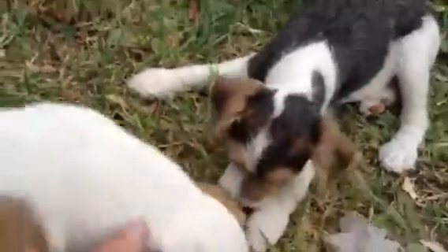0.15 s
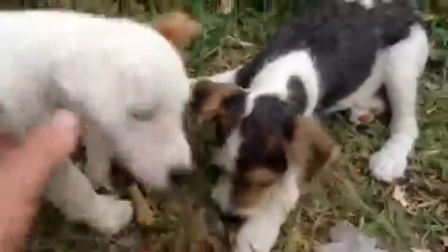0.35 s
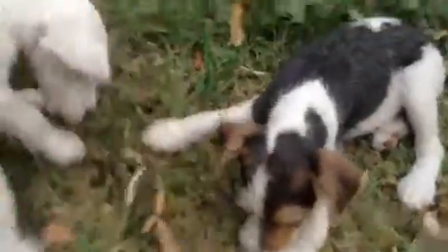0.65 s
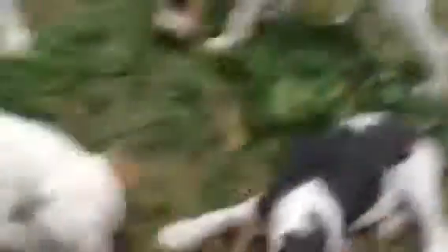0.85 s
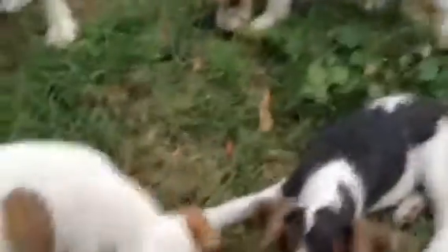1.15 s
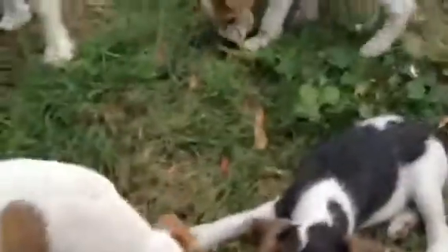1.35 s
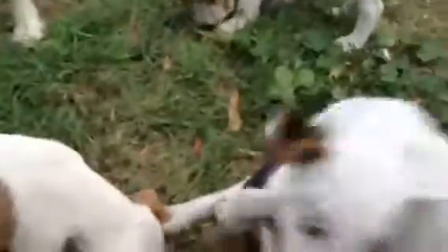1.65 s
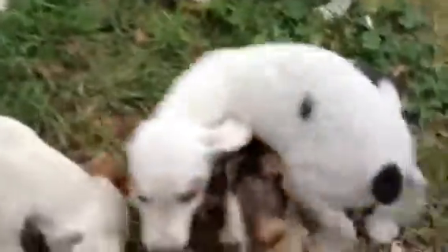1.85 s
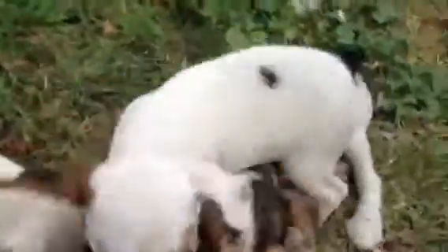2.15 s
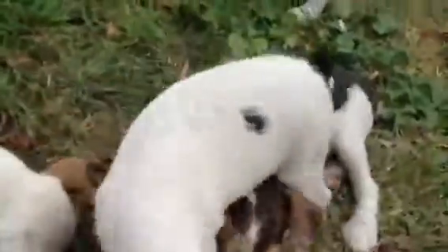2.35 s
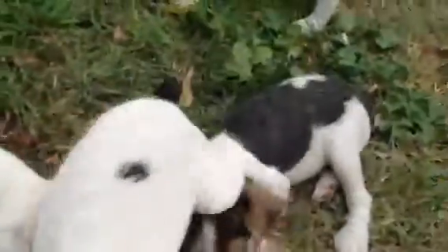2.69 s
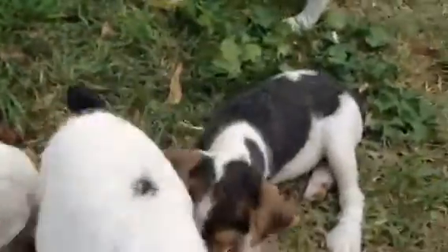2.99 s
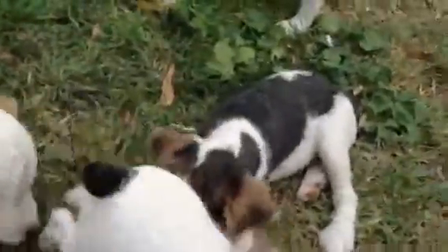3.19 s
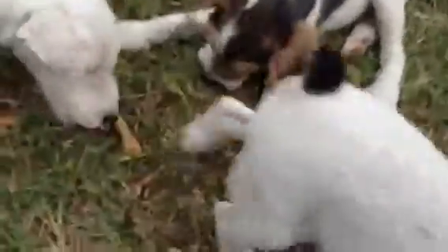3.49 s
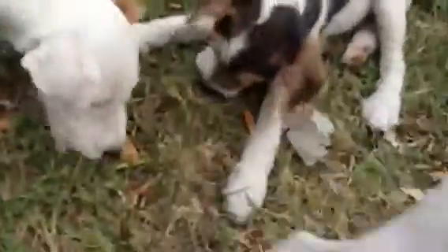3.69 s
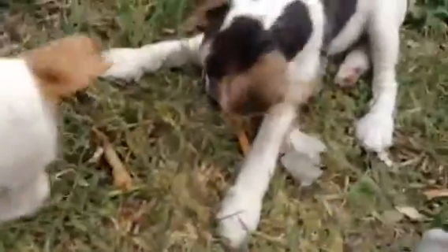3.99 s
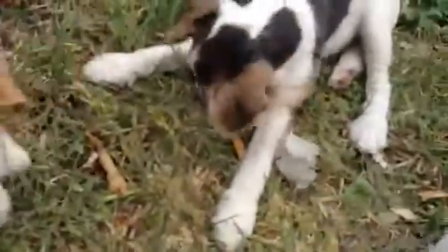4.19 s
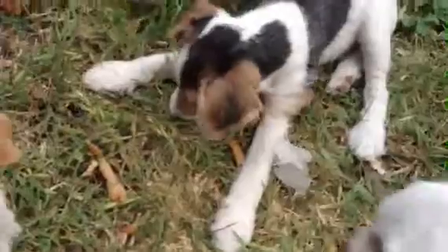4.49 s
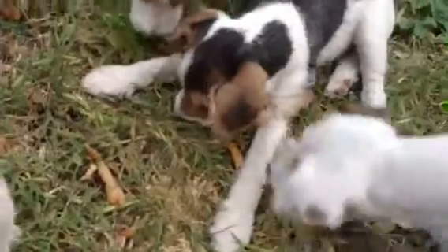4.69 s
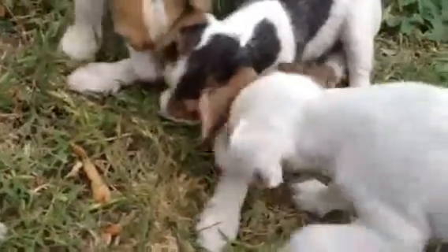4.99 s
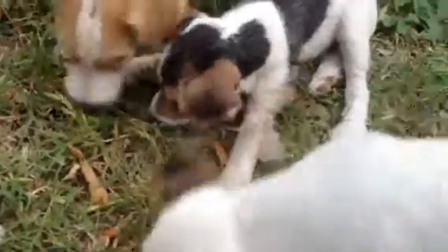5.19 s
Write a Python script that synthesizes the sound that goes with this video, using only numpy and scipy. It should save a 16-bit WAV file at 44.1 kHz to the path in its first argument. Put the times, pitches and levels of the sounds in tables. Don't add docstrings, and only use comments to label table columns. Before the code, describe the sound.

Puppies rustle through grass, snuffling and ticking their teeth, with one very loud splintering crunch at one second, sparrows chirping behind.

```python
import sys
import numpy as np
from scipy import signal
from scipy.fft import rfft, irfft
from scipy.io import wavfile
from scipy.ndimage import uniform_filter1d

SR = 44100
rng = np.random.default_rng(int(sys.argv[2]) if len(sys.argv) > 2 else 0)


def transcribe(u):
    v = np.clip(np.atleast_2d(u).T, -1, 1)
    q = np.round(v * 32767).astype(np.int16)
    wavfile.write(sys.argv[1], SR, q)


def makeup_ratio(level_db):
    decades = np.asarray(level_db, float) / 20
    return 10 ** decades


N = 235690
TIME = np.arange(N) / SR

# (time [s], peak level [dB], ring frequency [Hz], thud level [dB], decay time T60 [s])
CHEW_CRACKS = [(.9427, -17, 7200, -14, .005), (.9637, -27, 9400, -30, .004), (.9702, -27, 10200, -30, .012),
               (.9763, -13, 8200, -22, .012), (.9826, -4.5, 9200, -18, .006), (.9828, -12, 3600, -20, .006),
               (.9899, -5, 5500, -26, .004), (.9929, -20, 8100, -22, .003), (.9998, -40, 1800, 10, .004),
               (1.0031, -6, 9000, -26, .004), (1.0112, -14, 7500, -19, .008),
               (1.0120, -12, 7000, -13, .005), (1.0163, -6, 7000, -18, .005),
               (1.0180, -4, 10500, -24, .004)]


def unit(x):
    return x / np.sqrt(np.mean(x ** 2))


def columns(table, at=TIME):
    s, *rest = np.transpose(table)
    return [np.interp(at, s, c) for c in rest]


def colour(x, table):
    hz, db = np.transpose(table)
    f = np.maximum(np.arange(len(x) // 2 + 1) * SR / len(x), 1)
    gain = makeup_ratio(np.interp(np.log(f), np.log(hz), db))
    return irfft(rfft(x) * gain, len(x))


def band(x, hz, width):
    hz = min(hz, SR * .4)
    return signal.lfilter(*signal.iirpeak(hz, max(hz / width, .3), SR), x)


def walk(rate, size=N):
    hold = max(int(SR / rate), 1)
    levels = np.repeat(rng.standard_normal(size // hold + 1), hold)
    return 1.2 * uniform_filter1d(levels, hold)[:size]


def add(out, s, x):
    i = int(s * SR)
    out[i:i + len(x)] += x[:N - i]


def ducking(db, back_s):
    since = TIME - 1.01
    return db * (since > 0) * np.exp(-np.maximum(since, 0) / back_s)


def town():
    # (frequency [Hz], level [dB per Hz])
    town_colour = [(18, -58.5), (33, -40), (60, -17.5), (103, -0.5), (170, 1), (394, -7), (461, -8.5),
                   (721, -4), (1280, -5), (1700, -11), (2680, -19), (4300, -20), (8000, -27.5),
                   (16000, -41)]
    level_db = -60.5 + ducking(-3.5, 0.19) + ducking(-6, 0.72) + ducking(-2, np.inf)
    rumble_db = 2 + ducking(-4, 0.26) + ducking(-3, np.inf)
    swell_db = 4 * np.exp(-((TIME - 5.7) / 0.92) ** 2)
    level_db = level_db + 0.15 * swell_db
    rumble_db = rumble_db + swell_db

    air = colour(rng.standard_normal(N), town_colour)
    bass = colour(air, [(250, 1.5), (500, -21)])
    middle = colour(air, [(500, -40), (600, 0), (1500, 0), (1700, -40)])
    air = (air + bass * (makeup_ratio(rumble_db + .8 * walk(12)) - 1)) / np.std(middle)
    hum_db = -61.5 + ducking(-18, np.inf) + .8 * walk(6)
    hum = np.sin(2 * np.pi * 120 * TIME + 0.25 * walk(16)) * makeup_ratio(hum_db)
    return air * makeup_ratio(level_db + 0.6 * walk(5)) + hum


def whistle(hz, db):
    wobble = walk(300, size=8192)[:len(hz)]
    flutter = walk(163, size=8192)[:len(hz)]
    cycles = np.cumsum(hz * (1 + .009 * wobble)) / SR
    return makeup_ratio(db + 3 * flutter) * np.sin(2 * np.pi * cycles)


def sparrows():
    # (time [s], length [s], level [dB], upper top frequency [Hz], lower voice level [dB])
    chirp_events = [
        (.151, .106, -50.5, 4130, 0),
        (1.026, .104, -65.5, 4150, -4),
        (2.14, .112, -56.5, 4030, 0),
        (3.988, .106, -55.5, 4110, -2),
    ]
    # (share of length [1], upper pitch ratio [1], lower pitch ratio [1], upper [dB], lower [dB])
    chirp_arc = [(0, .88, .8, -22, -15), (.12, .935, .86, -7, -9), (.24, .975, .92, 0, -5),
                 (.4, 1, .99, -1, -5), (.56, .985, .985, -2, 0), (.72, .965, .92, -8, -1),
                 (.88, .95, .87, -17, -5), (1, .94, .83, -24, -14)]
    # (time [s], length [s], level
    # [dB], start frequency [Hz], end frequency [Hz])
    thin_notes = [(.655, .022, -61, 3830, 3900), (.68, .016, -63, 3400, 3450),
                  (.701, .016, -55, 3400, 3440), (.733, .02, -60, 3480, 3560),
                  (.757, .035, -65, 3600, 3500), (2.095, .06, -64, 2720, 3350),
                  (2.155, .022, -62, 3550, 3640), (2.714, .024, -65, 3880, 3820),
                  (2.762, .024, -63, 4600, 4900), (2.776, .02, -65, 3380, 3320),
                  (2.8, .052, -63, 3370, 3520), (2.856, .014, -68, 3450, 3400),
                  (3.39, .014, -60, 3380, 3330), (4.512, .03, -62, 3380, 3420),
                  (4.56, .035, -64, 3500, 3280), (4.675, .012, -62, 3750, 4000),
                  (4.694, .02, -58, 3900, 3650), (4.724, .018, -62, 3150, 3400),
                  (5.308, .014, -53, 3920, 3880), (5.316, .016, -54, 3620, 3680),
                  (5.334, .012, -58, 3700, 3750)]
    # (time [s], length [s], level [dB], centre frequency [Hz], width [Hz])
    hoarse_rasps = [(0.624, 0.083, -57.5, 4330, 1100), (2.699, .06, -65, 4300, 1400),
                    (2.756, 0.077, -63, 4200, 1200), (4.496, 0.094, -63.5, 3500, 1100),
                    (4.676, 0.045, -62, 4200, 1300), (5.299, 0.035, -61, 3760, 600)]
    out = np.zeros(N)
    for s, length, db, upper_hz, lower_db in chirp_events:
        up, low, up_db, low_db = columns(chirp_arc, TIME[:int(length * SR)] / length)
        upper = whistle(upper_hz * up, db + up_db)
        lower = whistle(.915 * upper_hz * low, db + lower_db + low_db)
        add(out, s, upper + lower)
    for s, length, db, start_hz, end_hz in thin_notes:
        share = TIME[:int(length * SR)] / length
        note = whistle(start_hz + (end_hz - start_hz) * share, db)
        add(out, s, note * np.sqrt(np.sin(np.pi * share)))
    for s, length, db, hz, width in hoarse_rasps:
        rasp = unit(band(band(rng.standard_normal(8192), hz, width), hz, width))
        share = np.clip(TIME[:8192] / length, 0, 1)
        add(out, s, makeup_ratio(db) * rasp * np.sqrt(np.sin(np.pi * share).clip(0)))

    t = TIME[:SR // 4]
    echoes = rng.standard_normal(len(t)) * makeup_ratio(-34 - 60 * t / .3)
    echoes[int(.036 * SR)] += makeup_ratio(-8)
    return out + signal.fftconvolve(out, echoes)[:N]


def brushing_db():
    # (time [s], level [dB])
    stirring = [(0, -59), (.3, -50.5), (.52, -52.5), (.85, -60.5), (1.04, -69.5), (1.45, -63), (2.1, -64),
                (2.5, -68.5), (3.1, -66.5), (3.25, -57.5), (3.6, -60), (3.8, -54.5), (4.03, -57.5),
                (4.44, -56.5), (4.87, -59.5), (5.14, -61.5), (5.34, -60.5)]
    # (peak time [s], peak level [dB], rise per 10 dB [s], fall per 10 dB [s])
    swishes = [(.204, -47, 0.025, 0.11), (0.586, -42, 0.057, 0.048), (.742, -49.5, 0.056, 0.032),
               (.93, -44, 0.048, 0.027), (1.179, -57, 0.025, 0.024), (1.305, -49.5, 0.022, 0.05),
               (1.33, -48, 0.031, 0.022), (1.626, -52, 0.034, 0.063), (1.695, -46, 0.0084, 0.025),
               (1.816, -57, 0.087, 0.37), (2.125, -53.5, 0.022, 0.09), (2.484, -56, 0.031, 0.023),
               (2.602, -59, 0.057, 0.15), (3.122, -52.5, .005, .009), (3.137, -47.5, .005, 0.0065),
               (3.179, -52, 0.05, 0.048), (3.312, -49, 0.016, 0.023), (3.47, -50.5, 0.045, 0.029),
               (3.556, -55.5, 0.13, 0.039), (3.825, -52.5, .04, .1), (3.893, -50, 0.15, 0.026),
               (4.143, -54, 0.33, 0.66), (4.526, -51, 0.1, 0.17), (4.753, -54.5, .08, .05),
               (4.997, -51.5, 0.083, 0.091), (5.029, -57, .03, 0.034), (5.203, -48, 0.037, 0.022),
               (5.242, -51.5, 0.059, 0.04)]
    s, db, rise, fall = np.transpose(swishes)[:, :, None]
    sweeps = db - 10 * np.maximum((s - TIME) / rise, (TIME - s) / fall)
    return np.maximum(sweeps.max(axis=0), columns(stirring)[0])


def grass():
    # (frequency [Hz], level [dB per Hz])
    blade_colour = [(880, -12), (1500, -13.5), (2370, -9.5), (4830, -3.5), (5660, -5), (7030, -2),
                    (13800, -2), (15500, -1.5), (16000, -30)]
    # (time [s], level [dB])
    tearing = [(.93, -48), (.953, -47), (.968, -41), (.975, -33), (.989, -31), (.997, -50), (1.01, -45),
               (1.019, -37), (1.024, -66)]
    flicks = rng.standard_normal(N) * makeup_ratio(0.95 * rng.exponential(size=N)) * (rng.random(N) < .45)
    tufts = makeup_ratio(1.78 * walk(90) + 0.89 * walk(300))
    blades = unit(colour(flicks, blade_colour) * tufts)
    stalks = colour(rng.standard_normal(N) * tufts, [(900, -24.0), (1800, -9.5), (4500, -8.5), (7000, -33.5)])
    brushing = makeup_ratio(brushing_db()) * (blades * makeup_ratio(-.5) + unit(stalks) * makeup_ratio(-13))
    fibres = unit(colour(blades, [(2000, -2.5), (5000, -3.5), (10000, -6.5), (14000, -18)]))
    splintering = np.abs(TIME - .98) <= .048
    return np.where(splintering, fibres * makeup_ratio(columns(tearing)[0]), brushing)


def thuds():
    # (time [s], peak level [dB], frequency [Hz])
    thumps = [(0.855, -38, 130), (.853, -46, 62), (1.013, -32, 290), (1.011, -36, 400),
              (1.693, -40, 244), (1.694, -47, 1400), (2.764, -50, 180), (3.029, -50, 187)]
    out, t = np.zeros(N), TIME[:4096]
    for s, db, hz in thumps:
        envelope = makeup_ratio(db - 60 * t / 0.031) * np.minimum(t / 0.0023, 1)
        add(out, s, envelope * np.sin(2 * np.pi * hz * t))
    return out


def whine():
    # (time [s], pitch [Hz], level [dB])
    whimper = [
        (4.155, 810, -72),
        (4.18, 770, -65),
        (4.2, 710, -60),
        (4.22, 770, -62),
        (4.24, 830, -70),
    ]
    hz, db = columns(whimper)
    phase = 2 * np.pi * np.cumsum(hz) / SR
    on = (TIME > whimper[0][0]) & (TIME < whimper[-1][0])
    voice = np.sin(phase) + makeup_ratio(-5) * np.sin(2 * phase) + makeup_ratio(-7) * np.sin(3 * phase)
    return on * makeup_ratio(db + 5.5) * voice


def snuffles():
    # (time [s], length [s], level [dB], brightness [dB per octave], lowest resonance level [dB])
    nose_puffs = [(0.182, 0.054, -44, 5, 5), (0.42, 0.05, -41, 6, 6), (0.484, 0.057, -48.5, 6, 1),
                  (0.875, 0.022, -48.5, -5, -8), (0.888, 0.061, -43, 3.5, -3.5),
                  (1.127, 0.031, -52.5, -0.5, -2), (1.157, 0.035, -56.5, 0.5, -2),
                  (1.364, 0.034, -57.5, 4.5, 8), (1.691, 0.062, -58, 7, 5), (1.879, 0.042, -54.5, 9, 3.5),
                  (2.264, 0.045, -53.5, 7.5, -8), (3.035, 0.066, -60, 7, 5), (4.718, 0.039, -57.5, 6, 3)]
    # (frequency [Hz], width [Hz], level [dB])
    nose_modes = [(754, 114, 5.5), (1300, 270, -1.5), (1903, 220, -2), (2180, 280, -6.5), (2550, 280, -5.5),
                  (3650, 1440, -16), (4300, 450, -20.5)]
    out = np.zeros(N)
    for s, length, db, tilt_db, low_db in nose_puffs:
        air = rng.standard_normal(8192) * makeup_ratio(2.0 * walk(400, size=8192))
        puff = np.zeros(8192)
        for hz, width, mode_db in nose_modes:
            gain_db = mode_db + tilt_db * np.log2(hz / 750) + low_db * (hz < 1000)
            puff += makeup_ratio(gain_db) * band(band(air, hz, width), hz, width)
        share = np.clip(TIME[:8192] / length, 0, 1)
        add(out, s, makeup_ratio(db - 2.5) * unit(puff) * np.sin(np.pi * share) ** 0.41)
    return out


def smacks():
    # (time [s], peak level [dB], frequency [Hz], rise [s], decay time T60 [s])
    wet_pops = [(0.054, -44, 2000, 0.00092, 0.013), (.087, -45, 1780, .001, 0.024),
                (0.577, -40, 1035, 0.0013, 0.022), (.832, -38, 1784, 0.0014, 0.021),
                (0.883, -32.5, 1860, 0.00045, 0.016), (0.899, -38, 2256, 0.003, 0.15),
                (.915, -36.5, 1293, 0.0064, .06), (1.13, -45.5, 2300, 0.011, 0.059),
                (1.181, -55.5, 2320, .008, 0.056), (1.365, -59, 2460, .016, .092),
                (1.72, -51, 2170, 0.014, 0.14), (1.857, -57, 2410, .002, 0.054),
                (1.882, -40.5, 2145, 0.016, 0.06), (2.282, -48.5, 2550, 0.0059, 0.05),
                (2.42, -53, 2550, 0.016, 0.044), (2.662, -56.5, 2510, 0.0068, 0.046),
                (3.028, -46.5, 2220, 0.00082, 0.023), (3.936, -58, 2770, .002, 0.031),
                (4.732, -52.5, 1284, 0.0026, .095), (5.199, -52, 2590, 0.005, 0.025),
                (5.203, -48, 4040, .002, .02), (5.238, -51, 2400, .002, .02),
                (.917, -41, 2400, 0.0035, .04), (.936, -32.5, 1730, 0.0016, 0.018),
                (3.309, -52, 3150, .002, .02), (5.029, -45, 2880, 0.0012, 0.0092),
                (.881, -44, 750, 0.0025, 0.025)]
    out, t = np.zeros(N), TIME[:6144]
    for s, db, hz, rise, t60 in wet_pops:
        glide = (1 + 13 * rise) ** (t / 0.044 - .3)
        cycles = np.cumsum(hz * glide * (1 + 0.037 * walk(700, size=len(t)))) / SR
        ring = np.sin(2 * np.pi * cycles) * makeup_ratio(3.0 * walk(360, size=len(t)))
        hiss = unit(band(rng.standard_normal(len(t)), hz, 850))
        fade = makeup_ratio(-60 * np.maximum(t - rise, 0) / max(t60, .005)) * np.minimum(t / max(rise, .0005), 1)
        pop = (ring + 0.22 * hiss) * fade
        add(out, s, makeup_ratio(db) * pop / np.abs(pop).max())
    return out


def fractures(events, width_hz, body_hz, edge, spike):
    out, t = np.zeros(N), TIME[:2048]
    for s, db, hz, thud_db, t60 in events:
        noise = rng.standard_normal((2, len(t)))
        noise[0, 8] += spike
        fade = makeup_ratio(-60 * t / max(t60, .001)) * np.minimum(t / .00015, 1)
        wide = colour(noise[0], [(800, -23.5), (3000, -6), (13000, -3), (16000, -10)])
        crack = (band(noise[0], hz, width_hz) + edge * wide) * fade
        knock = band(noise[1] * makeup_ratio(-60 * t / 0.015), body_hz, 1040)
        both = crack / np.abs(crack).max() + makeup_ratio(thud_db) * knock / np.abs(knock).max()
        add(out, s, makeup_ratio(db) * both)
    return out


def stalk_snaps():
    # (time [s], peak level [dB])
    snap_events = [(.1106, -44), (0.738, -47), (0.8846, -34), (1.171, -45), (1.3075, -48), (1.3275, -43),
                   (1.338, -47), (2.4626, -41.5), (3.119, -44), (3.122, -43), (3.138, -39), (3.1608, -50),
                   (3.182, -40), (3.2125, -45), (3.3085, -31), (3.3115, -32), (3.321, -40), (3.458, -35),
                   (3.47, -41), (3.481, -34), (3.696, -42), (3.795, -38), (3.8605, -38), (3.9035, -38),
                   (3.908, -36), (3.9295, -37), (4.261, -33.5), (4.5222, -37), (4.734, -37), (4.983, -39),
                   (4.9898, -37), (4.997, -36), (4.9985, -30), (5.0094, -37), (5.024, -35), (5.199, -32),
                   (5.2025, -31), (5.2047, -30), (5.2064, -29), (5.2405, -46), (5.2454, -44)]
    events = [(s, db, 11600, -14, .006) for s, db in snap_events]
    return fractures(events, 3300, 1000, edge=0.35, spike=2.5)


def teeth():
    # (time [s], peak level [dB], ring frequency [Hz])
    tooth_ticks = [(0.2238, -34, 3420), (0.5754, -36, 3800), (.578, -32, 3700), (0.5850, -29, 3550),
                   (0.5960, -28, 4300), (.743, -31.5, 8200), (0.903, -34, 7000), (.92, -28, 8260),
                   (0.9264, -25, 8000), (1.242, -47.5, 4870), (1.293, -39, 7800), (1.31, -39.5, 7000),
                   (1.332, -37.5, 5100), (1.614, -42, 8000), (1.6938, -35, 7700), (1.696, -39.5, 3500),
                   (1.706, -42, 2980), (1.9634, -55, 7480), (2.031, -56, 6270), (2.1208, -38, 8860),
                   (2.281, -43.5, 4500), (2.6019, -39, 4230), (2.85, -39.5, 8300), (2.906, -46.5, 3910),
                   (3.137, -44, 8350), (3.1668, -40.5, 3200), (3.1735, -43, 6500), (3.3445, -41, 4300),
                   (3.556, -43, 4140), (3.8188, -41, 8410), (3.8245, -41, 7000), (3.8431, -35, 4760),
                   (3.939, -46, 2800), (4.114, -41.5, 3770), (4.285, -45, 3000), (4.53, -42, 6000),
                   (4.538, -44, 3700), (4.561, -37, 6500), (4.7164, -47, 4170), (5.0032, -39, 5500),
                   (5.0064, -36, 4800), (5.013, -41, 7000), (5.0297, -33, 6900), (5.1342, -45, 7040),
                   (5.1537, -43, 8660), (5.1745, -44, 6500), (5.297, -40, 4800), (4.983, -42, 4600)]
    events = [(s, db, hz, -26, .008) for s, db, hz in tooth_ticks]
    return fractures(events, 1800, 1000, edge=0.33, spike=2.5)


def tag():
    # (frequency [Hz], level [dB], decay time T60 [s])
    tag_modes = [(5561, -15, 0.33), (7574, -3, 0.24), (8463, -18, 0.2)]
    out, t = np.zeros(N), TIME[:SR // 2]
    ring = sum(makeup_ratio(db - 56.0 - 60 * t / t60) * np.sin(2 * np.pi * hz * t) for hz, db, t60 in tag_modes)
    add(out, CHEW_CRACKS[-1][0], ring)
    return out


def chew():
    return fractures(CHEW_CRACKS, 4000, 1070, edge=0.6, spike=4)


def scene():
    near = whine() + snuffles() + smacks() + stalk_snaps() + teeth() + tag() + chew()
    near = signal.sosfilt(signal.butter(3, 100, "high", fs=SR, output="sos"), near)
    heard = town() + sparrows() + grass() + thuds() + near
    return signal.sosfilt(signal.butter(3, 48, "high", fs=SR, output="sos"), heard)[None]


def roll_off(x):
    return signal.sosfilt(signal.butter(12, 16480, fs=SR, output="sos"), x)


def record(dry):
    cut = signal.sosfilt(signal.cheby2(10, 40, 15900, fs=SR, output="sos"), dry)
    return roll_off(cut)


dry = scene()
out = record(dry)
transcribe(out)
```